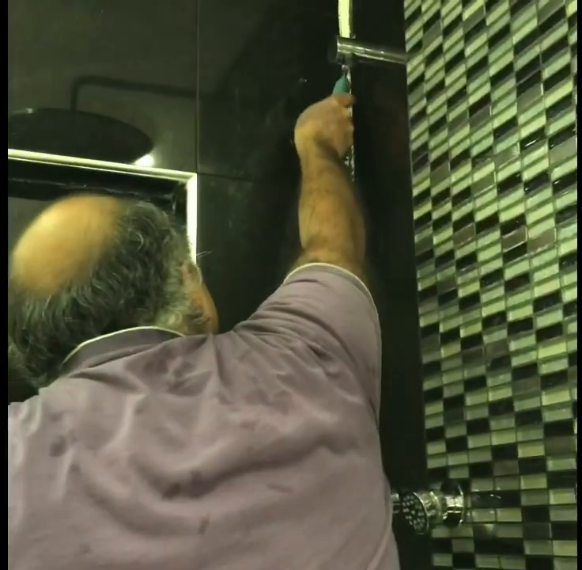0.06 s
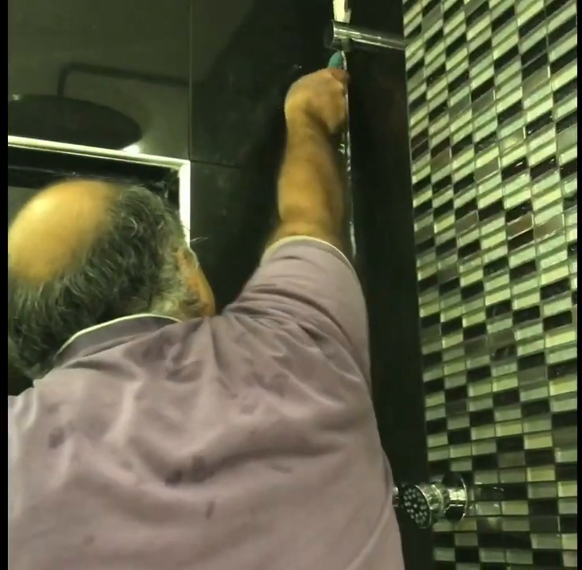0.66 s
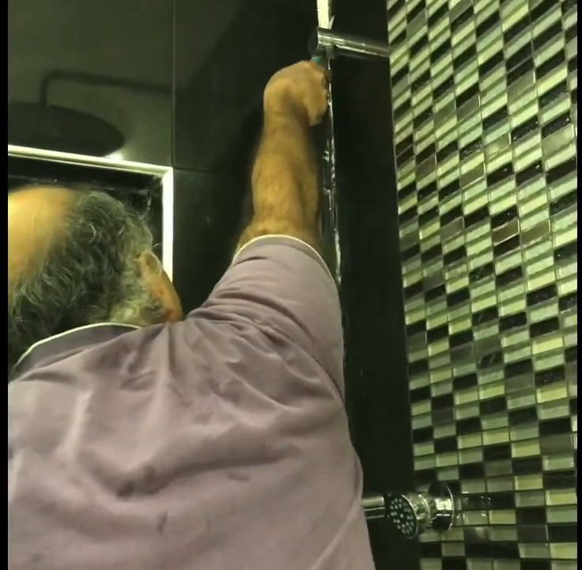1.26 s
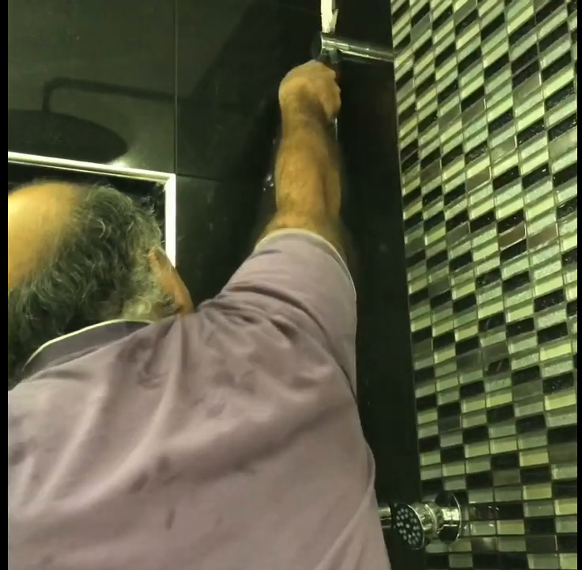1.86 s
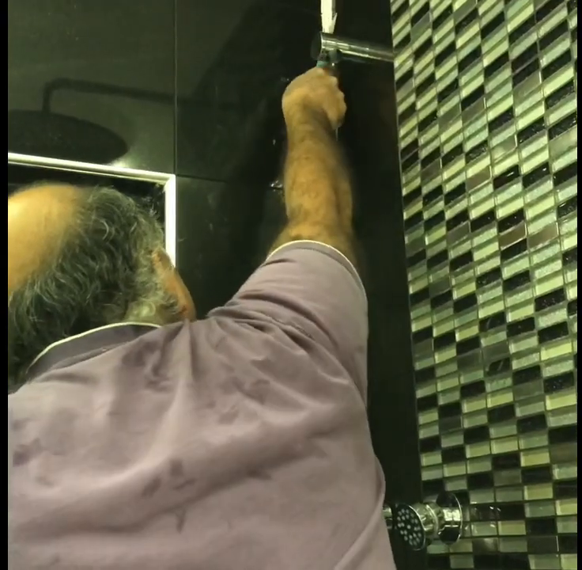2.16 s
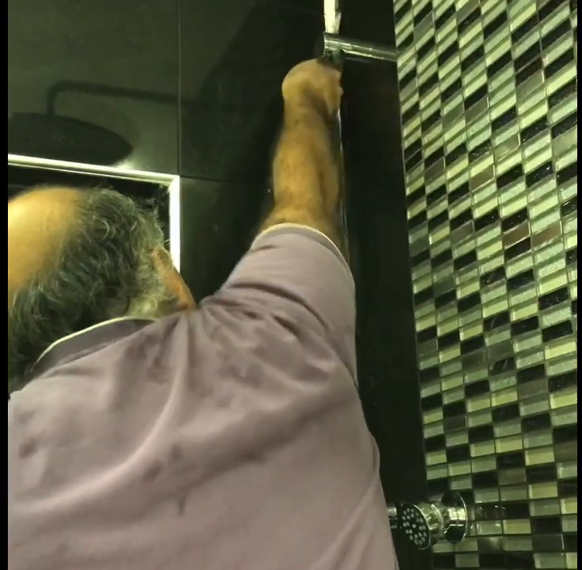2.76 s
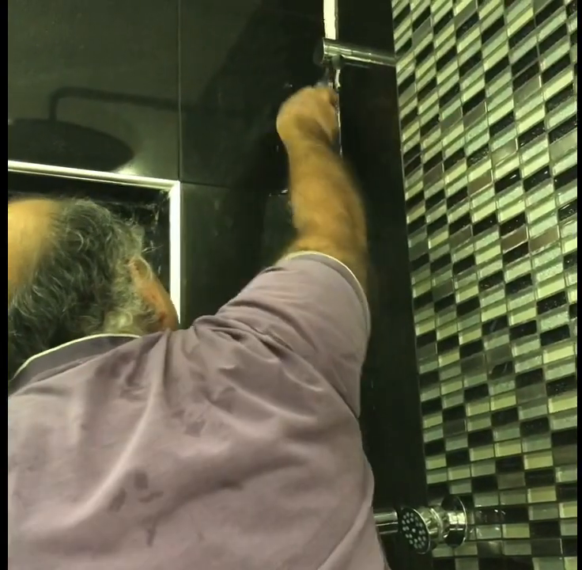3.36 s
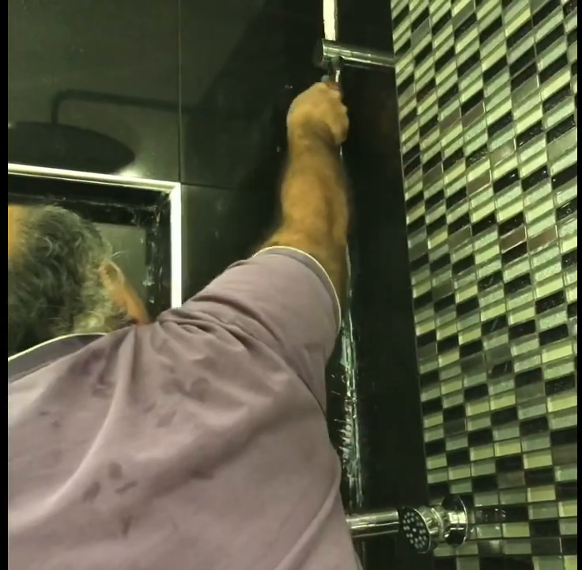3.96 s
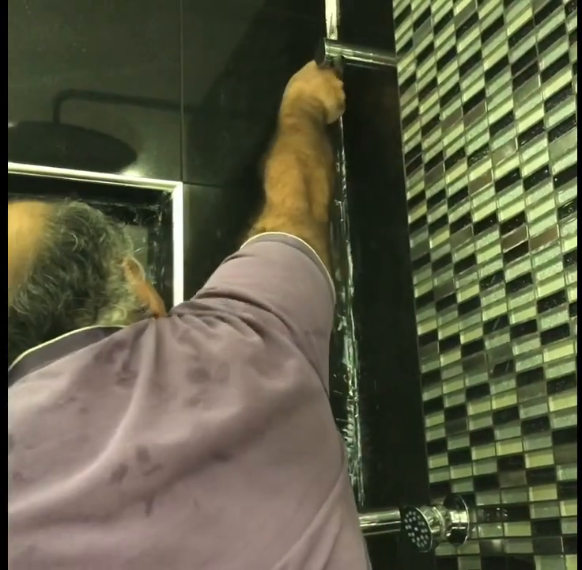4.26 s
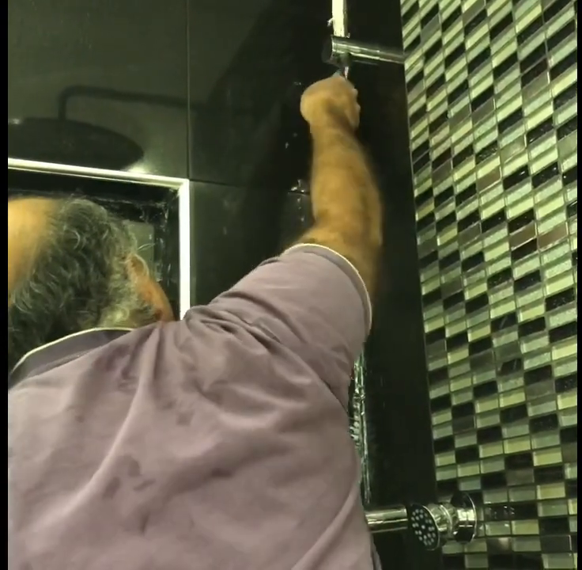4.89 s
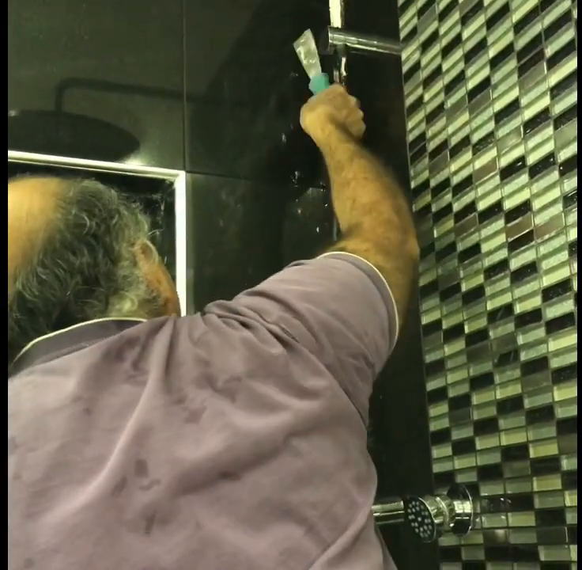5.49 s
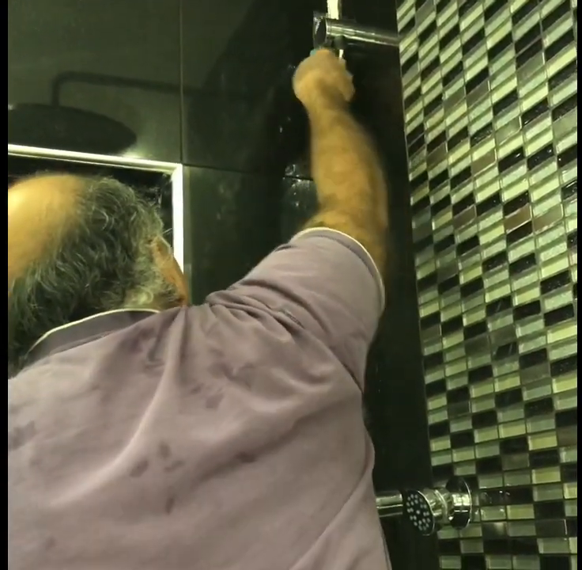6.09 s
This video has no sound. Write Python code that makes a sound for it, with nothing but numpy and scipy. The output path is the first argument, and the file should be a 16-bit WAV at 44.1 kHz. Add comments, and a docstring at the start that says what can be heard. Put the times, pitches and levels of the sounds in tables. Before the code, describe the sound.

A steel hand scraper digs old sealant from a tiled shower joint. Short, uneven strokes drag and rasp, with gritty crackles, brief blade chatter, light clicks and a few dull bumps on the wall. The strokes get quicker and louder, then several hard jabs make the blade ring near the end. It is heard from nearby, with a tight echo off the tiles and a faint ventilation hiss.

```python
"""Scraping sealant in a tiled shower

A steel hand scraper works old sealant out of a joint. Short strokes drag, rasp and crackle,
and now and then the blade chatters, or slips and hits the wall. Near the end, four hard jabs
ring the blade. The close tiles answer the work, over a faint hiss of ventilation."""
import sys
import numpy as np
from scipy import signal
from scipy.fft import rfft, irfft, next_fast_len
from scipy.io import wavfile
from scipy.ndimage import map_coordinates

SR = 44100
rng = np.random.default_rng(int(sys.argv[2]) if len(sys.argv) > 2 else 0)


def wrap_up_sound(samples):
    """Save the sound to the file named by the first command line argument, as 16-bit audio."""
    columns = np.atleast_2d(samples).T
    # keep every value between -1 and 1, then stretch to whole-number steps
    tamed = np.clip(columns, -1, 1)
    steps = np.round(tamed * 32767).astype(np.int16)
    wavfile.write(sys.argv[1], SR, steps)


N = 270584

TOP_HZ = 16000


def amp(db):
    """Decibels to gain."""
    return 10 ** (np.asarray(db) / 20)


def unit(x):
    """Scaled to rms 1."""
    return x / np.sqrt(np.mean(x ** 2) + 1e-20)


def along(points, hz):
    """(Hz, value) points read on a log axis."""
    f, v = np.transpose(points)
    return np.interp(np.log(hz + 1), np.log(f + 1), v)


def add(track, s, sound):
    """Mix a sound into the track at time s."""
    start = max(round(s * SR), 0)
    track[start:start + len(sound)] += sound[:N - start]


def wobble(rate):
    """A smooth random curve, rate knots a second."""
    return map_coordinates(rng.standard_normal(int(N * rate / SR) + 4), [np.arange(N) * rate / SR])


def filtered(x, response):
    """x times a response of frequency."""
    m = next_fast_len(len(x) + SR // 4)
    return irfft(rfft(x, m) * response(np.fft.rfftfreq(m, 1 / SR)), m)[:len(x)]


def causal(points, resonances=(), size=2048):
    """The minimum-phase response of a (Hz, dB) spectrum with resonant lifts on it."""
    hz = np.fft.rfftfreq(size, 1 / SR)
    lift = sum(db / (1 + (2 * (hz - centre) / width) ** 2) for centre, width, db in resonances)
    cepstrum = irfft(np.log(amp(along(points, hz) + lift)))
    cepstrum[1:size // 2] *= 2
    cepstrum[size // 2 + 1:] = 0
    return irfft(np.exp(rfft(cepstrum)))


def answer(x, build_s=0.001, treble_db=-4):
    """The dense, slightly duller echo of the close tiled walls."""
    # The stall's reverb. Each row: frequency in Hz, seconds to fall 60 dB.
    decay_times = [(100, 0.99), (500, 0.7), (1400, 0.47), (3700, 0.6), (9700, 0.33), (16000, 0.22)]
    hz, t, spectra = signal.stft(rng.standard_normal(SR), SR, nperseg=256)
    decay_db = -60 * t / along(decay_times, hz)[:, None]
    tail = signal.istft(spectra * amp(decay_db + treble_db * hz[:, None] / TOP_HZ), SR, nperseg=256)[1]
    tail *= 1 - np.exp(-np.arange(len(tail)) / SR / build_s)
    return signal.fftconvolve(x, tail / np.linalg.norm(tail))[:len(x)]


def shower(x, wet_db):
    """A sound together with its echo."""
    return x + amp(wet_db) * answer(x)


def pressure(start_s, bite_s, length_s, fade_db_per_s, onset_db=16, sag_db_per_s=10.5):
    """One stroke's envelope: the edge bites, the push eases, the sound dies as the hand stops."""
    t = np.arange(N) / SR - start_s
    swell = np.clip(t / max(bite_s, 1e-3), 0, 1)
    sag_db = sag_db_per_s * np.clip(t, 0, length_s)
    fade_db = fade_db_per_s * np.maximum(t - length_s, 0)
    return (t >= 0) * amp(-onset_db * (1 - swell) - sag_db - fade_db)


def effort(pushes, levels_db, fade_db_per_s):
    """One friction layer's envelope through all the strokes; overlaps add in power."""
    return np.sqrt(sum((amp(db) * pressure(*push[:3], fade_db_per_s)) ** 2
                       for push, db in zip(pushes, levels_db)))


def friction(spectrum, slips_per_s, spread_db, smooth_db, judder_db):
    """Many tiny slips of uneven size over a smooth rub, with their echo, at rms 1."""
    # Broad resonances of the pressed tool. Each row: centre in Hz, width in Hz, lift in dB.
    tool_resonances = [(1130, 260, 3), (1650, 180, 5), (2380, 220, 7), (3080, 220, 6), (3630, 330, 6),
                       (5850, 330, 8), (7700, 330, 6), (9250, 350, 8), (10800, 350, 7), (12150, 350, 9),
                       (13550, 350, 6), (15100, 500, 6)]
    sizes = amp(spread_db * np.minimum(rng.exponential(size=N), 4))
    slips = unit((rng.random(N) < slips_per_s / SR) * sizes * rng.choice([-1, 1], N))
    rub = amp(smooth_db) * rng.standard_normal(N)
    grip = amp(judder_db * wobble(70))  # the edge grips and lets go
    contact = signal.fftconvolve((slips + rub) * grip, causal(spectrum, tool_resonances))[:N]
    return unit(shower(contact, wet_db=0.5))


def strokes():
    """The edge drags the rubbery bead, rasps on the tile and breaks off crumbs of grit."""
    # Pushes along the joint. Each row: start, time to bite and length in seconds,
    # then the levels of drag, rasp and grit in dB.
    pushes = [(0, 0.00083, 0.24, -63, -54.5, -65.5), (0.357, 0.082, 0.13, -64.5, -55.5, -65.5),
              (0.62, 0.092, 0.15, -65, -52, -62.5), (0.948, 0.047, 0.14, -69.5, -60, -58),
              (1.268, 0.065, 0.27, -60, -53.5, -57), (1.56, .04, 0.16, -68, -65.5, -64.5),
              (1.848, 0.053, 0.2, -63, -51, -58), (2.409, 0.014, 0.1, -63.5, -47.5, -60),
              (2.669, 0.014, 0.06, -67, -63.5, -73), (2.742, 0.083, 0.18, -57.5, -46.5, -54),
              (2.97, 0.061, 0.12, -58, -54, -59.5), (3.158, 0.13, 0.12, -57.5, -49, -58),
              (3.429, 0.039, 0.14, -39.5, -40.5, -49.5), (3.614, 0.048, 0.22, -51, -54.5, -63),
              (3.885, .04, 0.085, -58, -57.5, -59.5), (4.065, 0.071, 0.16, -46, -44, -51),
              (4.316, 0.054, 0.083, -51.5, -53, -51.5), (4.538, 0.062, 0.13, -51.5, -49.5, -60.5),
              (4.624, 0.035, 0.09, -59.5, -56, -47.5), (4.834, .04, .13, -63.5, -54.5, -60.5),
              (5.028, 0.057, 0.2, -56, -50.5, -57), (5.752, 0.048, 0.042, -45.5, -74, -33),
              (6.005, 0.023, 0.14, -50.5, -47, -50.5)]
    # The tone of each layer. Each row: frequency in Hz, relative level in dB.
    drag_tone = [(40, -30), (90, -9), (170, -15), (250, -3.5), (320, -5.5), (430, -3.5), (570, -8),
                 (750, -3), (1150, -2), (1470, -10.5), (1700, -8.5), (2600, -15.5), (5000, -50)]
    rasp_tone = [(600, -25.5), (1400, -3), (2100, -2), (2800, -3), (3600, 0.5), (4300, 1), (5200, -5),
                 (7000, -16.5), (12000, -36)]
    grit_tone = [(2500, -39), (4500, -2.5), (5850, -9), (7200, -1.5), (9300, -5.5), (12200, -5),
                 (15000, -5.5), (16000, -6)]
    *_, drag_db, rasp_db, grit_db = np.transpose(pushes)
    drag = friction(drag_tone, slips_per_s=500, spread_db=4.5, smooth_db=0.5, judder_db=2.2)
    rasp = friction(rasp_tone, slips_per_s=700, spread_db=1, smooth_db=-9, judder_db=6.0)
    grit = friction(grit_tone, slips_per_s=460, spread_db=7.5, smooth_db=0.5, judder_db=4.0)
    return (drag * effort(pushes, drag_db, fade_db_per_s=77)
            + rasp * effort(pushes, rasp_db, fade_db_per_s=114)
            + grit * effort(pushes, grit_db, fade_db_per_s=157))


def room_tone():
    """A faint bed of ventilation hiss with an unsteady low drone."""
    # The tone of the air. Each row: frequency in Hz, relative level in dB.
    air_tone = [(25, -49), (40, -11), (60, 1), (90, 1.5), (200, 1), (400, -5), (800, -7.5), (1600, -13.5),
                (4000, -13.5), (8000, -20.5), (16000, -24)]
    hiss = unit(filtered(rng.standard_normal(N), lambda hz: amp(along(air_tone, hz))))
    drone = unit(filtered(rng.standard_normal(N), lambda hz: 1 / (1 + ((hz - 51) / 6) ** 4)))
    return amp(-65.0) * hiss + amp(-69.5) * drone


def chatter():
    """The flexing blade sings roughly in a narrow band while it is caught."""
    # Each row: midpoint and length in seconds, pitch and bandwidth in Hz, level at the midpoint in dB.
    catches = [(0.176, 0.29, 2900, 450, -62.5), (1.087, 0.27, 3540, 350, -65), (1.06, 0.28, 2460, 250, -67),
               (1.362, 0.2, 2900, 1100, -58), (1.938, 0.085, 3700, 500, -50),
               (1.96, 0.087, 2470, 400, -50.5), (3.3, 0.24, 2780, 930, -54), (4.888, 0.1, 4060, 400, -56.5),
               (6.08, 0.089, 1200, 268, -39.5)]
    t, out = np.arange(N) / SR, np.zeros(N)
    for middle_s, length_s, pitch, width, db in catches:
        band = filtered(rng.standard_normal(N), lambda hz: 1 / (1 + (2 * (hz - pitch) / width) ** 2))
        swell = np.cos(np.pi * np.clip((t - middle_s) / length_s, -.5, .5))
        out += amp(db) * unit(band) * swell
    return shower(out, wet_db=-9.0)


def contact_colour(hz, hardness, muffled_hz, pivot_hz=3260, thud_hz=640, knock_hz=1060):
    """A blow's EQ in dB: hard ones are brighter, cushioned ones lose their top and hollow knock."""
    tilt = hardness * np.log2(hz / pivot_hz) / (1 + (thud_hz / hz) ** 4)  # spares the wall's low thud
    muffle = 19 / (1 + (muffled_hz / hz) ** 8)  # sealant under the edge
    knock_db = 4 * np.log2(muffled_hz / 11700)  # a barer edge knocks the tile harder
    knock_band = np.exp(-(np.log2(hz / knock_hz) / 0.57) ** 2)
    return tilt - muffle + knock_db * knock_band


def ringing(modes, t, life=1):
    """Decaying modes, struck a little differently each time; life scales their decay times."""
    return sum(amp(db + rng.standard_normal() - 60 * t / (life * t60))
               * np.sin(2 * np.pi * (hz * t + rng.random())) for hz, db, t60 in modes)


def blows(contact_s=0.0065, grain_db=3, crack_db=26, echo_db=21.5, clink_db=7, free_db=-6.0):
    """Each blow is a few milliseconds of steel crunching on tile, and it rings the blade."""
    # Each row: start in seconds, relative strength in dB, hardness as a tilt in dB per octave,
    # frequency in Hz above which it is muffled, trim of the blade's ring in dB.
    blade_hits = [(.761, -48, -2, 16200, -34), (1.455, -52.5, 2.5, 9900, -20), (1.801, -49, 4.5, 4540, -22),
                  (1.969, -43, -0.5, 13900, -13), (2.14, -63, 4, 5100, -8), (2.355, -43.5, 3.5, 19700, -5),
                  (2.415, -42, -0.5, 7200, -2.5), (2.879, -49, 2, 20100, -18),
                  (3.062, -46.5, 1, 20000, -10.5), (3.299, -53.5, 1.5, 19900, -27),
                  (3.441, -50, -5, 12000, -20), (3.739, -46.5, -0.5, 12000, -17),
                  (4.068, -55.5, -0.5, 19470, -28), (4.11, -48.5, 1, 6000, -13),
                  (4.434, -45, -2.5, 17000, -15), (4.466, -34.5, -1, 5050, -27),
                  (4.645, -48.5, -1.5, 8850, -15), (4.872, -53, 3.5, 12500, -5),
                  (4.946, -51.5, 0, 13800, -20), (5.177, -42.5, 1, 7000, -16),
                  (5.29, -49.5, 1.5, 20000, -13), (5.389, -30, 3, 9030, -7.5),
                  (5.575, -37.5, 3, 22000, 1.5), (5.725, -29, 2.5, 24400, -5), (5.8, -53, 6, 20000, -15),
                  (5.894, -29.5, 0.5, 16900, -21)]
    # The tone of steel striking tile. Each row: frequency in Hz, relative level in dB.
    contact_tone = [(30, -27), (150, -9), (260, 3), (560, -1.5), (850, 11), (1180, 14), (1500, 7.5),
                    (2000, 9.5), (4500, 6), (5700, 5.5), (8500, 5.5), (10400, 2), (16000, 6.5)]
    # The blade swinging free. Each row: pitch in Hz, relative level in dB, seconds to fall 60 dB.
    blade_modes = [(4158, -2, .55), (5290, -13, .3), (6120, 1, .62), (7215, -11, .4), (8220, -3, .45),
                   (8563, -12, .25), (10468, -13, .35), (10957, -1, .27), (11010, 2, .2), (11230, -5, .15),
                   (13555, -4, .14), (13917, -2, .3)]
    t, out = np.arange(SR * 3 // 4) / SR, np.zeros(N)
    grid_hz = np.geomspace(30, TOP_HZ, 120)
    for start_s, strength_db, hardness, muffled_hz, ring_db in blade_hits:
        click_db = along(contact_tone, grid_hz) + contact_colour(grid_hz, hardness, muffled_hz)
        click = causal(list(zip(grid_hz, click_db)))
        click = np.pad(click, (0, len(t) - len(click)))
        grains = rng.standard_normal(len(t)) * amp(grain_db * rng.standard_normal(len(t)))
        crunch = grains * np.exp(-(t / contact_s) ** 2)
        crack = signal.fftconvolve(crunch / np.linalg.norm(crunch), click)[:len(t)]
        # a harder contact reaches the blade's higher modes
        excited = [(hz, db + contact_colour(hz, hardness, muffled_hz), t60)
                   for hz, db, t60 in blade_modes]
        # the tile chokes most of the ring to a clink; a thin part swings on freely
        clink = shower(ringing(excited, t, life=0.084), wet_db=0)
        free = shower(ringing(excited, t), wet_db=-7)
        blade = amp(ring_db) * (amp(clink_db) * clink + amp(free_db) * free)
        echo = amp(echo_db) * answer(click + crack)
        add(out, start_s, amp(strength_db) * (amp(crack_db) * crack + echo + blade))
    return out


def bumps(push_s=0.014, boom_rise_s=0.074):
    """A soft, dull push rings the wall; the deep boom of the stall builds up more slowly."""
    # Each row: start in seconds, relative level of the wall's ring in dB, level of the boom in dB.
    nudges = [(1.963, -38, -55), (2.845, -44.5, -52), (3.057, -46.5, -62), (4.360, -47, -56.5)]
    # The wall's resonances. Each row: centre in Hz, width in Hz, relative level in dB.
    wall_modes = [(255, 27, -2.5), (337, 90, -8.5), (406, 41, 1.5), (554, 110, -8), (595, 13, 8),
                  (726, 280, -8)]
    wall = lambda hz: sum((-1) ** k * amp(db) * 1j * hz * width
                          / (centre * centre - hz * hz + 1j * hz * width)
                          for k, (centre, width, db) in enumerate(wall_modes))
    boom_tone = [(35, -6), (60, 7.5), (125, -8.0), (200, 0.5), (500, -70)]  # Hz, relative dB
    t, out = np.arange(SR) / SR, np.zeros(N)
    swell = (t / boom_rise_s * np.exp(1 - t / boom_rise_s)) ** 2
    for start_s, ring_db, boom_db in nudges:
        push = rng.standard_normal(SR) * np.exp(-t / push_s)
        ring = shower(filtered(push, wall), wet_db=-1.5)
        ring /= np.std(ring[:SR // 10])
        boom = unit(filtered(rng.standard_normal(SR), lambda hz: amp(along(boom_tone, hz))))
        add(out, start_s, amp(ring_db - 6.0) * ring + amp(boom_db) * boom * swell)
    return out


def scene():
    """The scraper, the wall and the air, mixed in mono."""
    return (strokes() + chatter() + blows() + bumps() + room_tone())[None]


def record(dry):
    """A brick-wall low-pass takes off the very top."""
    return np.array([filtered(channel, lambda hz: hz < TOP_HZ) for channel in dry])


dry = scene()
out = record(dry)
wrap_up_sound(out)
```